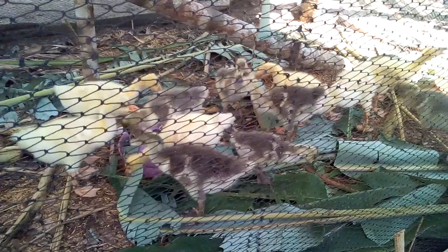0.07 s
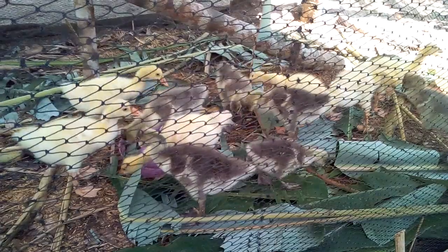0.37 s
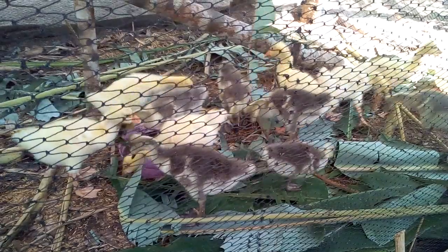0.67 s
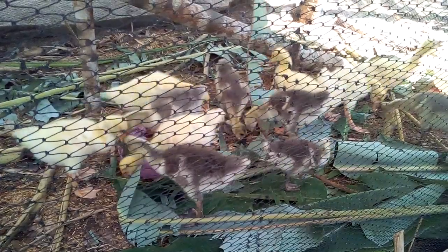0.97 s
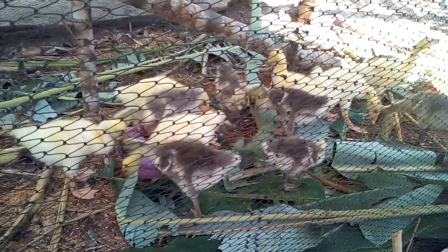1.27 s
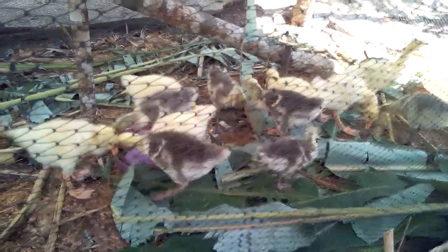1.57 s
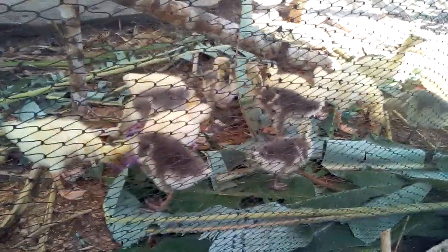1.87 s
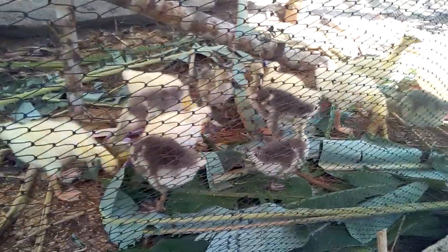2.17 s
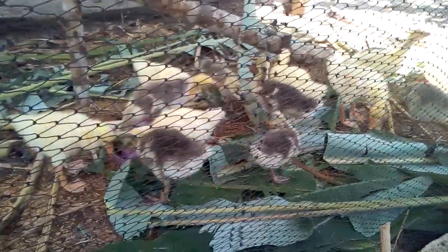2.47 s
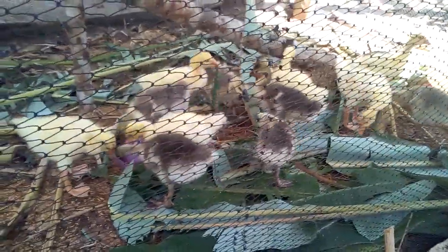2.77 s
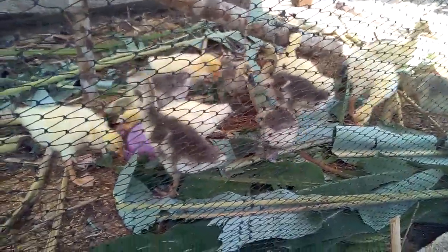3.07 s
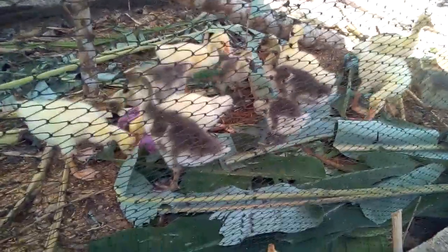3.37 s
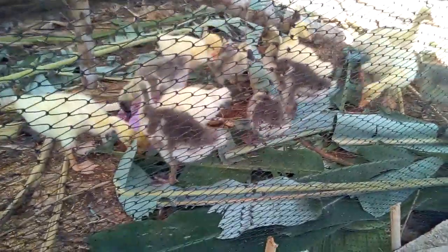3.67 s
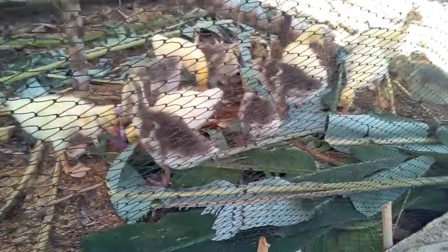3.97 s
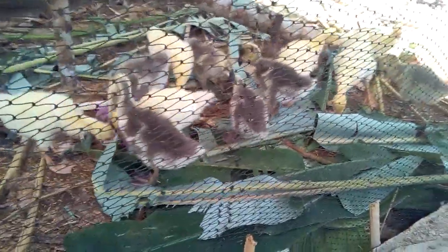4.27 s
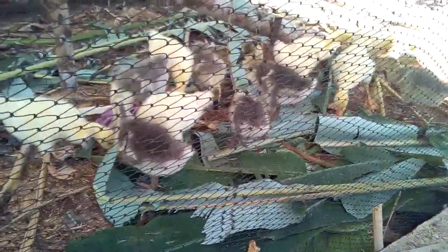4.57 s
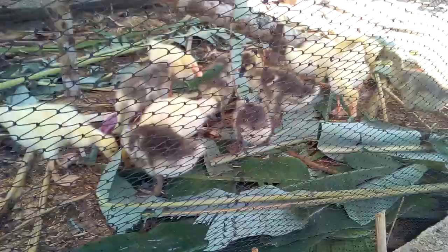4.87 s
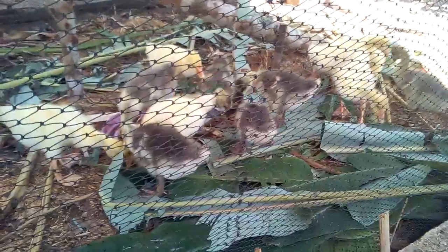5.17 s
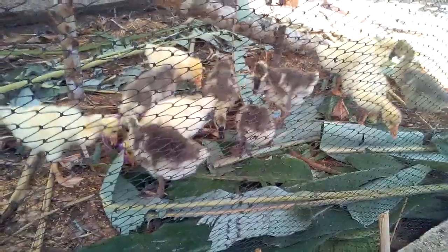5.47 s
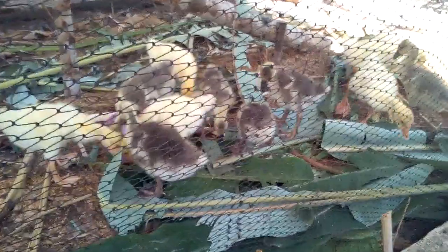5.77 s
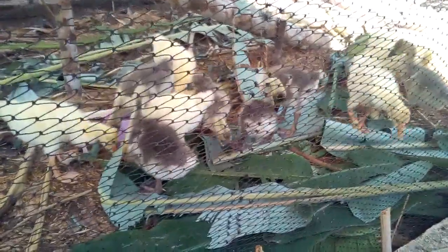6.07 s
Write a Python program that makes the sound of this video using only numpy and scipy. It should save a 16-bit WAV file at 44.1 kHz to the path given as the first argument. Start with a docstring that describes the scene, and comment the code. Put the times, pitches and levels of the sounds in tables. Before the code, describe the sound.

Soft, raspy peeps and airy hisses from young geese feeding outdoors, among light bill snaps, taps and faint litter rustle.

```python
"""Goslings feeding in a pen.

A brood eats big leaves in a netted outdoor pen, a step away. Each syrinx whistles arched, partly
rasping peeps; air forced through open bills makes long hisses, the last one close. Bills snap at
leaves, pecks and steps knock on the ground, litter rustles, and air bumps the microphone."""
import sys
import numpy as np
from scipy import signal
from scipy.fft import rfft, irfft, next_fast_len
from scipy.io import wavfile

SR = 44100
rng = np.random.default_rng(int(sys.argv[2]) if len(sys.argv) > 2 else 0)


def to_wav(sig):
    """Store sig (one row per channel, or 1-D mono) as 16-bit WAV at the path in sys.argv[1].

    Samples outside -1..1 are clipped; the rate is SR.
    """
    pcm = np.clip(np.atleast_2d(sig), -1, 1) * 32767
    pcm = np.round(pcm).astype(np.int16)
    wavfile.write(sys.argv[1], SR, pcm.T)  # frames by channels


N = 274743
TIME = np.arange(N) / SR

# Table levels are before each source's gain; pan_db is left over right.
# outdoor air: freq_hz, density_db
AIR_SPECTRUM = [(20, -26), (32, -14), (50, -2), (85, 2), (115, 0.1), (150, -5), (220, -4), (350, -10),
                (600, -11), (850, -15), (1500, -19), (2500, -34), (5000, -70)]
# left-right likeness of the background: freq_hz, coherence
COHERENCE = [(40, 1), (80, 0.3), (150, 1), (500, 0.51), (1200, 0.057), (4000, 0), (12000, 0.12)]
# feet and bills shuffling in the litter: time_s, level_db
SHUFFLE_CURVE = [(0.3, -68.5), (0.5, -67.5), (0.63, -65.5), (1.53, -63.5), (1.68, -60), (2.19, -67.5),
                 (2.42, -59), (2.86, -65), (3.32, -62), (3.65, -64), (3.88, -63), (4.14, -62.5),
                 (4.38, -67.5), (4.62, -64), (5.5, -59.5), (5.87, -58), (6.2, -59)]
# litter rustle: freq_hz, density_db
LITTER_SPECTRUM = [(300, -45), (600, -6.5), (1400, -5.5), (2200, -3), (2900, -4), (3900, 4.5), (4700, -3.5),
                   (5600, -10), (7200, -17), (8300, -28.5), (13300, -29.5), (15000, -19)]
# dry leaf cracking underfoot: freq_hz, density_db
CRACKLE_SPECTRUM = [(1500, -15), (3200, 0.5), (4700, 1.5), (7000, -14), (9000, -31.5)]
# air puffs on a microphone port: time_s, peak_db, pitch_hz, pan_db
AIR_PUFFS = [(2.364, -41, 69.5, 23), (2.557, -47, 76, 10.5), (3.105, -44.5, 88, -17),
             (3.401, -43, 59.8, -20), (3.455, -35, 85, -21), (3.598, -37.5, 80, -30),
             (3.779, -35.5, 85, -20), (4.433, -36.5, 75, -30)]
# pecks and steps: start_s, level_db, thud_hz, pan_db, clack_re_thud_db
PECKS_AND_STEPS = [(0.618, -44, 421.3, -3.5, -3), (.633, -39, 300, -2, -7), (1.133, -39.5, 236.4, -3, -12),
                   (1.207, -35, 544, -2, -13.5), (1.317, -34, 226, -1, -8), (1.329, -38, 247.9, -3, -25),
                   (1.741, -35, 248, -2.5, -21), (1.7797, -31, 245, -4.5, -2), (1.793, -34, 248, 0, -29),
                   (1.857, -38, 230.5, -3, -26), (1.964, -39.5, 300, -3, -21), (2.007, -38.5, 245, -1, -21),
                   (2.098, -39.5, 221, -2, -13), (2.175, -37.5, 543, -6, -28.5), (2.403, -30, 616, -2, -19),
                   (2.428, -38.5, 448, -4, 1), (2.513, -37, 509, 5, -20), (2.5422, -20.5, 316, 17, -21),
                   (2.5433, -24.5, 754, 14, -32), (3.088, -41.5, 208, -2, -8.5), (3.716, -41, 398, -3, -12),
                   (3.877, -46, 477, -2, 1), (3.984, -36, 606, -2, -12), (4.102, -33, 700, -5, -10),
                   (4.125, -36, 384, -12, -5.5), (4.215, -27, 270.6, -18, -22),
                   (4.271, -22.5, 745, -8, -26), (4.274, -25, 343, 5, -42), (4.332, -35, 506, -4, -18),
                   (4.445, -37, 484, -6, -24), (4.472, -38.5, 607, -3, -33), (4.578, -35.5, 577, -3, -27),
                   (5.212, -34, 585, -2, -27), (5.484, -36, 800, -7, -6.5)]
# stiff leaf: freq_hz, level_db, t60_s
LEAF_MODES = [(501, -9.5, 0.055), (720, -4, 0.02), (1078.8, 3.5, 0.016), (1510, 6, 0.0066),
              (1620, 5, 0.018)]
# bills snapping at leaves: start_s, level_db, pan_db, tick_hz, body_re_tick_db, build_s
BILL_SNAPS = [(1.202, -40, -6, 4700, 1.5, 0.0038), (1.217, -36.5, -14, 4540, 0, 0.0023),
              (1.645, -25, -9, 4450, -5.5, 0.0019), (1.655, -31.5, 5.5, 4500, -4, 0.0022),
              (2.426, -27, -15, 4160, -4, 0.0017), (2.433, -24, 16.5, 4340, -11, 0.00066),
              (3.573, -41, 2.5, 3300, -9, .0018), (3.619, -45, -5, 5400, -16, .0012),
              (3.771, -41, -5, 4600, 0, .0035), (3.877, -47, 2, 4900, -8, .002),
              (4.043, -42.5, -7, 4800, -14, 0.0038), (4.099, -39.5, -11, 4700, 4.5, 0.0063),
              (4.1253, -29.5, -19, 4200, -14, 0.00056), (4.2147, -20.5, -32, 4530, -7.5, 0.00035),
              (4.265, -29, -23, 4530, -14, 0.00078), (4.2695, -22.5, -10, 3760, -0.5, 0.00064),
              (4.2717, -14.5, -18, 4670, -27, 0.00052)]
# hisses mid-brood and faint wheezes behind: start_s, length_s, attack_s, release_s, level_db,
# sag_db_per_s, low_hz, high_hz, high_db, glide_oct_per_s, pan_db
FAR_HISSES = [(1.418, 0.36, 0.19, 0.13, -48, -5, 4060, 5900, -10, 0.0038, -4.5),
              (1.68, 1.01, 0.29, 0.15, -44, 5.5, 3927, 5667, -9.5, -.05, -3),
              (2.63, .89, 0.24, 0.093, -42.5, 5, 3875, 5740, -21, -.1, -3)]
WHEEZES = [(.08, 0.3, 0.0162, 0.065, -57.5, 60, 3640, 4520, -11, -0.04, -1.07),
           (.38, 0.89, 0.029, 0.036, -63.5, 14, 3650, 4480, -11, -0.01, -1),
           (3.45, 0.72, 0.06, 0.065, -62, 1, 3546, 4490, -12, -.03, -1),
           (4.259, 0.19, 0.03, 0.055, -58.5, 4, 3530, 4350, -25, -0.65, -1)]
# close hiss and its resonances: time_s, level_db, low_hz, mid_db, mid_hz, high_db, high_hz, air_db
CLOSE_HISS_CURVE = [(5.05, -38, 4135, -57, 5760, -55, 6400, -85.5),
                    (5.092, -45.5, 4413, -60, 5710, -60, 6400, -73),
                    (5.24, -37.5, 4414, -52, 5580, -46, 6420, -68),
                    (5.33, -34.5, 4486, -48, 5950, -38.5, 6500, -64),
                    (5.42, -34.5, 4580, -47, 5900, -35, 6600, -64),
                    (5.516, -31.5, 4690, -43, 6360, -36, 6820, -55),
                    (5.574, -36, 4780, -41, 6360, -41, 6950, -61.5),
                    (5.654, -33, 4740, -39.5, 6500, -38.5, 7200, -62),
                    (5.75, -34, 4804, -35.5, 6370, -42, 7300, -59),
                    (5.858, -33, 4627, -37, 5964, -55, 7600, -55.5),
                    (5.962, -29.5, 4660, -36, 5840, -48, 7600, -55),
                    (5.992, -33, 4850, -34, 5900, -47, 7600, -54),
                    (6.074, -31.5, 4550, -38, 5480, -43, 7450, -57.5),
                    (6.23, -32, 4564, -34, 5310, -48, 7350, -57)]
# breath of the far hisses, of the close hiss, and its high air: freq_hz, density_db
FAR_RUSH_SPECTRUM = [(900, -17), (2000, -5.5), (2800, -9.5), (3800, 4.5), (4900, 5), (5600, -0.5),
                     (6600, -3.5), (7500, -12.5), (8200, -21.5), (9300, -21.5), (13000, -38), (15000, -46)]
CLOSE_RUSH_SPECTRUM = [(250, -23.5), (600, -17.5), (1200, -26.5), (1900, -12.5), (2400, -7), (3100, -7),
                       (3800, 1.5), (5000, -2), (6000, -5.5), (7700, -13), (8600, -30), (13300, -54)]
HIGH_AIR_SPECTRUM = [(5500, -23), (6800, 4), (7700, 5), (8500, 3), (9400, 2), (10500, -3), (13300, -20),
                     (15000, -7)]
# plain whistles: start_s, length_s, start_hz, end_hz, level_db, rasp, pan_db
WHISTLE_NOTES = [(0.399, 0.055, 3930, 4900, -48, 0.45, 3), (0.5, 0.04, 4880, 4600, -49, 0.35, 0),
                 (0.64, 0.065, 3550, 4900, -46.5, 0.65, 0), (0.755, 0.035, 4600, 3300, -50, 0.5, 0),
                 (0.845, 0.045, 3600, 4700, -48, 0.7, -2), (0.658, 0.062, 1786, 2637, -49.5, 0.7, -7.5),
                 (0.736, 0.1, 3225, 3264, -48.5, 0.1, 15), (0.765, 0.062, 4700, 4540, -49.5, .14, -0.5),
                 (0.935, 0.035, 4540, 4650, -48.5, 0.12, 2), (1.01, 0.17, 3445, 3380, -52, 0.05, 9.5),
                 (1.17, 0.103, 3340, 3195, -54.5, .2, 14), (1.072, 0.13, 1854, 3281, -56.5, 0.29, -3.5),
                 (1.117, 0.042, 4400, 3300, -50.5, 0.65, 2), (1.35, 0.071, 2321, 2350, -62, 0, -5),
                 (1.409, 0.087, 2508, 3063, -61, 0.15, -3), (1.478, 0.084, 1986, 3260, -52, 0.43, -3.5),
                 (1.532, 0.1, 2780, 3330, -47, 0.42, 2.5), (1.716, 0.23, 2897, 2832, -57, 0, 8.5),
                 (2.295, 0.052, 3312, 3480, -52.5, .1, 2.5), (2.591, 0.02, 3836, 3690, -41.5, 0.06, -3),
                 (2.844, .034, 2215, 2640, -50, 0.46, -0.5), (4.475, 0.05, 4250, 4100, -52, 0.5, 2),
                 (4.594, 0.028, 3330, 4239, -41.5, 0.08, 11), (4.687, 0.034, 4010, 4370, -51, 0.16, 3.5),
                 (4.743, 0.08, 4030, 3964, -50, 0.2, 3), (4.692, 0.0747, 2085, 2214, -50, 0.2, -4),
                 (4.976, 0.052, 5030, 4700, -47, 0.35, -1), (5.352, 0.028, 2080, 2300, -42, 0.05, 3)]
# arched peeps: top_s, climb_s, fall_s, start_hz, top_hz, end_hz, climb_db, fall_db, rest_rasp, pan_db,
# drop_s, break_half_s, break_depth_db, accent_db, second_voice_db
PEEP_CALLS = [(.224, 0.061, 0.12, 1550, 2810, 1760, -47, -56.5, 0.73, -4, 0.023, 0.028, 10.5, 11, -11),
              (.441, 0.064, 0.041, 1783, 2354, 2070, -52.5, -45.5, 0.43, -5, 0.02, 0.0087, 2, 2, -14),
              (.49, 0.041, 0.1, 2500, 3405, 1945, -49, -45.5, 0.58, -3.5, 0.019, .014, 4, 3.5, -15),
              (0.694, 0.075, 0.065, 2600, 4185, 2140, -43.5, -43, 0.24, -1.5, 0.017, 0.029, 5, 3, -24),
              (0.776, 0.044, 0.1, 2171, 2620, 1985, -54, -47.5, 0.48, -3, 0.024, 0.013, 1, 5, -20.5),
              (.89, 0.057, 0.084, 3150, 4690, 2264, -45.5, -46, 0.38, -2.5, 0.021, 0.016, 16, -1, -31),
              (3.675, 0.094, 0.064, 1900, 2517, 1680, -51, -53.5, 0.71, -4, 0.02, 0.018, 8.5, 9, -5),
              (3.934, 0.081, 0.11, 1566, 2693, 1637, -45, -49, 0.19, -4.5, 0.024, 0.014, 31, 13, -20),
              (4.2, 0.081, 0.079, 1855, 2778, 1632, -44, -43, 0.06, -4.5, 0.034, 0.02, 9, 2, -7.5),
              (4.501, 0.091, 0.066, 2320, 4050, 3140, -58, -48, 0.08, 3.5, 0.017, 0.028, 12, -12, -30),
              (4.645, .062, 0.055, 1597, 3270, 2042, -46, -46, 0.33, -2, 0.017, 0.0115, 1, 4, -5),
              (4.79, 0.062, 0.053, 2630, 2513, 1806, -51, -54.5, 0.2, 6.5, 0.018, 0.017, 3.5, 7, -13),
              (4.901, 0.067, 0.083, 2150, 3760, 2122, -43, -45, 0.17, 5.5, 0.026, 0.0185, 2.5, -6, -28),
              (5.002, 0.055, 0.09, 2150, 3750, 1789, -47, -52.5, 0.35, 4, 0.0187, 0.026, 13, 7, -12),
              (5.158, 0.067, 0.1, 1600, 3005, 1710, -51, -52, 0.38, -3, 0.024, 0.021, 3.5, 3, -11),
              (5.411, 0.066, 0.051, 1950, 3340, 1920, -46, -45.5, 0.15, 3, 0.019, 0.019, 4.5, 5, -25)]
# echoes off the ground and pen sides: left_delay_s, right_delay_s, level_db
PEN_ECHOES = [(.0023, 0.0022, -5.5), (.0079, 0.011, -6), (0.0147, .0171, -9), (0.026, 0.025, -11.5)]

SURGE_DB, SURGE_HZ = 0.72, 27  # breath pressure in a hiss


def from_db(db):
    return 10 ** (np.asarray(db) / 20)


def unit_rms(x):
    return x / np.sqrt(np.mean(np.abs(x) ** 2) + 1e-20)


def in_time(rows):
    """Curve columns, interpolated per sample."""
    time_s, *columns = np.transpose(rows)
    return [np.interp(TIME, time_s, column) for column in columns]


def per_bin(points, size):
    """A spectrum at the FFT bins, interpolated in log frequency."""
    hz, value = np.transpose(points)
    return np.interp(np.log(np.fft.rfftfreq(size, 1 / SR) + 1), np.log(hz), value)


def butter(x, order, hz, kind="low"):
    return signal.sosfilt(signal.butter(order, hz, kind, fs=SR, output="sos"), x)


def gate(t, fade_s):
    return np.clip(np.minimum(t - t[0], t[-1] - t) / fade_s, 0, 1)


def panned(x, pan_db):
    """Constant-power stereo."""
    ratio = from_db(pan_db)
    return np.array([x * ratio, x]) * np.sqrt(2 / (1 + ratio ** 2))


def placed(x, pan_db, lag_s):
    """Pan, with the left microphone port lagging by lag_s."""
    left, right = panned(x, pan_db)
    size = next_fast_len(len(x) + SR // 100)
    delay = np.exp(-2j * np.pi * np.fft.rfftfreq(size, 1 / SR) * lag_s)
    return np.array([irfft(rfft(left, size) * delay, size)[:len(x)], right])


def add(out, start_s, sound):
    i = max(round(start_s * SR), 0)
    out[:, i:i + sound.shape[1]] += sound[:, :N - i]


def wander(rate_hz, size=N):
    """Smooth noise up to rate_hz; rms 1."""
    padded = next_fast_len(size, True)
    hz = np.fft.rfftfreq(padded, 1 / SR)
    bins = rfft(rng.standard_normal(padded)) / (1 + (hz / rate_hz) ** 4)
    return unit_rms(irfft(bins, padded)[:size])


def coloured(x, spectrum):
    """Filter by a spectrum; rms 1."""
    size = next_fast_len(x.shape[-1], True)
    bins = rfft(x, size) * from_db(per_bin(spectrum, size))
    return unit_rms(irfft(bins, size)[..., :min(x.shape[-1], N)])


def stereo_noise(spectrum):
    """Coloured noise, left and right alike in the bass, unrelated in the treble."""
    size = next_fast_len(N)
    alike = per_bin(COHERENCE, size)
    mid, side = rfft(rng.standard_normal((2, size)))
    bins = np.sqrt(1 + alike) * mid + np.sqrt(1 - alike) * side * [[1], [-1]]
    return coloured(irfft(bins, size), spectrum)


def resonance(hz, width_hz):
    """Turbulence ringing in a moving resonance; rms 1."""
    phase = 2 * np.pi * np.cumsum(hz) / SR
    return wander(width_hz / 2, len(hz)) * np.cos(phase) + wander(width_hz / 2, len(hz)) * np.sin(phase)


def ring(t, hz, t60_s):
    """A struck mode."""
    return np.sin(2 * np.pi * hz * t) * np.exp(-np.log(1000) * t / t60_s)


def pen(x, echo_db, tail_db, t60_s):
    """Add close echoes and a short scattered tail, different per side."""
    t = TIME[:SR // 3]
    response = rng.standard_normal((2, len(t))) * np.exp(-np.log(1000) * t / t60_s)
    response *= from_db(tail_db) / np.sqrt(np.sum(response ** 2) / 2)
    for left_s, right_s, db in PEN_ECHOES:
        response[[0, 1], [round(left_s * SR), round(right_s * SR)]] += from_db(db + echo_db)
    return x + signal.fftconvolve(x, response, axes=1)[:, :N]


def leaf_echo(x, start_s, echo_s, stretch_per_s, echo_db, right_ratio=1.31):
    """Add an echo off the leaves; its delay drifts as the head moves, so the comb glides."""
    delay_s = echo_s * np.exp(stretch_per_s * np.clip(TIME - start_s, 0, 2))
    left = np.interp(TIME - delay_s, TIME, x[0])
    right = np.interp(TIME - delay_s * right_ratio, TIME, x[1])
    return x + from_db(echo_db) * np.array([left, right])


def outdoor_air(level_db=-57, gust_db=2.5, gust_hz=9.6):
    """Low, gusting air noise."""
    return stereo_noise(AIR_SPECTRUM) * panned(from_db(level_db + gust_db * wander(gust_hz)), -2.5)


def litter(gain_db=11.5, grain_db=2, grain_hz=105, cracks_per_s=110, crack_db=-11):
    """Feet and bills stir the litter: grainy rustle, tiny cracks of dry leaf."""
    cracks = (rng.random((2, N)) < cracks_per_s / SR) * rng.standard_normal((2, N))
    rustle = stereo_noise(LITTER_SPECTRUM) + from_db(crack_db) * coloured(cracks, CRACKLE_SPECTRUM)
    return rustle * from_db(in_time(SHUFFLE_CURVE)[0] + gain_db + grain_db * wander(grain_hz))


def mic_bumps(sigma_s=0.0095, gain_db=-1):
    """Air puffs push a microphone port back and forth a couple of times."""
    out, t = np.zeros((2, N)), TIME[:SR // 8] - 1 / 16
    envelope = np.exp(-0.5 * (t / sigma_s) ** 2)
    for time_s, db, hz, pan_db in AIR_PUFFS:
        sway = np.sin(2 * np.pi * hz * t + 0.86 * wander(73, len(t)))
        add(out, time_s + t[0], panned(from_db(db + gain_db) * sway * envelope, pan_db))
    return out


def knock(hz, clack_db, t60_cycles=5, contact_hz=1900, crunch_db=-15, crunch_s=0.03):
    """The ground thuds; the leaf on it clacks and crunches as it gives."""
    t = TIME[:SR // 10]
    leaf = np.zeros(len(t))
    for k, (mode_hz, db, t60_s) in enumerate(LEAF_MODES):
        strength = (-1) ** k * from_db(db + rng.normal(0, 2.5))
        leaf += strength * ring(t, mode_hz * (1 + rng.normal(0, 0.04)), t60_s)
    crunch = unit_rms(butter(rng.standard_normal(len(t)), 2, [400, 1900], "band"))
    crunch *= from_db(crunch_db) * np.exp(-t / crunch_s)
    ground = from_db(-13) * ring(t, hz=215, t60_s=0.067)
    thud = butter(ring(t, hz, t60_cycles / hz) + ground, 1, 110, "high")
    return butter(thud + from_db(clack_db) * (leaf + crunch), 4, contact_hz)


def pecks_and_steps(gain_db=1, patter_db=-48.1, patter_count=50):
    """Clear knocks amid the brood's faint random patter."""
    out = np.zeros((2, N))
    for start_s, db, hz, pan_db, clack_db in PECKS_AND_STEPS:
        add(out, start_s, panned(from_db(db + gain_db) * knock(hz, clack_db), pan_db))
    for when, force, pitch in rng.random((patter_count, 3)):
        step = from_db(patter_db + 1.56 * force) * knock(200 + 480 * pitch ** 2, clack_db=-18)
        add(out, when * TIME[-1], panned(step, pan_db=-7))
    return out


def bill_snaps(gain_db=1, body_gain_db=-2, width_hz=1400, top_hz=6900, fizz_hz=13000, fizz_db=-2):
    """A bill closes on a leaf: tiny fractures build and die within milliseconds."""
    out, t = np.zeros((2, N)), TIME[:SR // 40]
    for start_s, db, pan_db, tick_hz, body_db, build_s in BILL_SNAPS:
        fractures = rng.standard_normal((2, len(t))) * t * np.exp(-t / build_s)
        tick = butter(fractures[0], 2, [tick_hz - width_hz / 2, tick_hz + width_hz / 2], "band")
        body = butter(fractures[1], 1, [800, 2600], "band")
        snap = tick / np.abs(tick).max() + from_db(body_db + body_gain_db) * body / np.abs(body).max()
        add(out, start_s, panned(from_db(db + gain_db) * snap, pan_db))
    out += 1e-18  # avoids denormals
    return butter(out, 6, top_hz) + from_db(fizz_db) * butter(out, 4, fizz_hz, "high")


def open_bill(hz, width_hz, core_db, stray=0.04, stray_hz=11):
    """Broad bill resonance with a narrow, half-whistling core straying in it; rms 1."""
    core = resonance(hz * (1 + stray * wander(stray_hz, len(hz))), width_hz=170)
    return unit_rms(resonance(hz, width_hz) + from_db(core_db) * core)


def hiss(row, rush_db, low_db, low_width_hz, core_db, high_width_hz, sputter_db, lag_s, bow_oct=0.12):
    """Air forced through an open bill: a rush and two gliding resonances, sputtering together."""
    start_s, length_s, attack_s, release_s, db, sag_db_per_s = row[:6]
    low_hz, high_hz, high_db, glide_oct_per_s, pan_db = row[6:]
    out, t = np.zeros((2, N)), np.arange(0, length_s, 1 / SR)
    from_middle_s = t - length_s / 2
    # the bill opens and closes, bowing the resonances upwards
    bend = 2 ** (glide_oct_per_s * from_middle_s + bow_oct * np.sin(np.pi * t / length_s))
    waver_hz = 110 * wander(14, len(t))
    low = from_db(low_db) * open_bill(low_hz * bend + waver_hz, low_width_hz, core_db)
    high = from_db(high_db) * resonance(high_hz * bend + waver_hz, high_width_hz)
    swell = np.clip(np.minimum(t / attack_s, (length_s - t) / release_s), 0, 1) ** 0.98
    unsteady_db = SURGE_DB * wander(SURGE_HZ, len(t)) + sputter_db * wander(63, len(t))
    pressure = swell * from_db(db - sag_db_per_s * from_middle_s + unsteady_db)
    rush = from_db(rush_db) * coloured(rng.standard_normal(len(t)), FAR_RUSH_SPECTRUM)
    add(out, start_s, placed(pressure * (rush + low + high), pan_db, lag_s))
    return out


def wheezes():
    """Faint, thin hisses from the back of the brood."""
    return sum(hiss(row, rush_db=-9, low_db=-1, low_width_hz=550, core_db=-4,
                    high_width_hz=880, sputter_db=3, lag_s=-0.00023) for row in WHEEZES)


def far_hisses():
    """Three hisses from mid-brood, echoing off the leaves."""
    out = np.zeros((2, N))
    for row in FAR_HISSES:
        direct = hiss(row, rush_db=-3.5, low_db=-3.3, low_width_hz=760, core_db=-5,
                      high_width_hz=1000, sputter_db=1.4, lag_s=0.00004)
        out += leaf_echo(direct, start_s=row[0], echo_s=0.0026, stretch_per_s=0.36, echo_db=-8)
    return out


def close_hiss(start_s=4.93, swell_s=0.19, sputter_db=0.63):
    """A long, near hiss: the top resonance climbs, the middle one flares and sinks, high air joins."""
    db, low_hz, mid_db, mid_hz, high_db, high_hz, air_db = in_time(CLOSE_HISS_CURVE)
    swell = np.clip((TIME - start_s) / swell_s, 0, 1)
    pressure = swell * from_db(SURGE_DB * wander(SURGE_HZ) + sputter_db * wander(88))
    rush = from_db(db - 7) * coloured(rng.standard_normal(N), CLOSE_RUSH_SPECTRUM)
    low = from_db(db - 4.5) * open_bill(low_hz, width_hz=1100, core_db=-4, stray=0.05)
    mid = from_db(mid_db - 6) * resonance(mid_hz, width_hz=1800)
    high = from_db(high_db - 6) * open_bill(high_hz, width_hz=700, core_db=-5, stray=0.033)
    air = from_db(air_db + 3.5) * coloured(rng.standard_normal(N), HIGH_AIR_SPECTRUM)
    lower = placed(pressure * (rush + low), pan_db=0.5, lag_s=-0.00022)
    upper = placed(pressure * (mid + high + air), pan_db=-5.5, lag_s=0.00015)
    return leaf_echo(lower + upper, start_s, echo_s=0.0051, stretch_per_s=-0.111, echo_db=-14)


def syrinx(t, hz, db, rasp, pan_db, jitter=0.105, jitter_hz=590, flutter_db=5.5, flutter_hz=200,
           bill_hz=4300, bill_half_width_hz=600, gain_db=1.85):
    """A whistling syrinx; rasp (0-1) shakes pitch and strength fast and irregularly."""
    phase = 2 * np.pi * np.cumsum(hz * (1 + jitter * rasp * wander(jitter_hz, len(t)))) / SR
    # the octave peaks at the bill resonance and fades above it
    boost_db = 9 / (1 + ((2 * hz - bill_hz) / bill_half_width_hz) ** 2)
    octave_db = -15 + boost_db - 47 * np.clip(hz / 2500 - 1, 0, 2)
    tone = np.sqrt(2) * (np.sin(phase) + from_db(octave_db) * np.sin(2 * phase))
    flutter = unit_rms(from_db(flutter_db * np.sqrt(rasp) * wander(flutter_hz, len(t))))
    lag_s = 0.00025 * np.tanh(0.11 - pan_db / 10)  # the louder side tends to lead
    return placed(tone * flutter * from_db(db + gain_db) * gate(t, 0.004), pan_db, lag_s)


def whistles(fade_db=5):
    """Thin notes on a straight glide, loudest midway."""
    out = np.zeros((2, N))
    for start_s, length_s, start_hz, end_hz, db, rasp, pan_db in WHISTLE_NOTES:
        t = np.arange(0, length_s, 1 / SR)
        progress = t / length_s
        hz = start_hz + (end_hz - start_hz) * progress
        add(out, start_s, syrinx(t, hz, db - fade_db * (2 * progress - 1) ** 2, rasp, pan_db))
    return out


def peeps(climb_bend=1.4, drop_bend=1.817, fade_db=10.5, accent_s=0.02, accent_width_s=0.0059,
          unsteady_db=2.5, unsteady_hz=55, second_ratio=0.84, leak_hz=4390):
    """The pitch climbs, the voice breaks into rasp at the top, then drops to a low note."""
    out = np.zeros((2, N))
    for (top_s, climb_s, fall_s, start_hz, top_hz, end_hz, climb_db, fall_db, rest_rasp, pan_db,
         drop_s, break_half_s, break_depth_db, accent_db, second_voice_db) in PEEP_CALLS:
        t = np.arange(-climb_s, fall_s, 1 / SR)
        from_top = np.clip(np.maximum(-t / climb_s, t / fall_s), 0, 1)
        climb_hz = start_hz + (top_hz - start_hz) * (1 - from_top) ** climb_bend
        drop_hz = end_hz + (top_hz - end_hz) * np.exp(-np.abs(t / drop_s) ** drop_bend)
        hz = np.where(t < 0, climb_hz, drop_hz)
        broken = np.exp(-(t / break_half_s) ** 4)
        rasp = rest_rasp + (1 - rest_rasp) * broken
        effort_db = np.interp(t, [-break_half_s, break_half_s], [climb_db, fall_db])
        accent = np.exp(-((t - accent_s) / accent_width_s) ** 2)
        db = effort_db - break_depth_db * broken + accent_db * accent - fade_db * from_top ** 3
        db += unsteady_db * wander(unsteady_hz, len(t))
        voice = syrinx(t, hz, db, rasp, pan_db)
        # the other side of the syrinx joins in lower
        second_db = db + second_voice_db - fade_db * from_top ** 2
        voice += syrinx(t, hz * second_ratio, second_db, rasp, pan_db)
        # air escapes through the bill
        leak_db = effort_db - 14 - 13 * from_top ** 2
        leak = resonance(np.full(len(t), leak_hz), width_hz=2000) * from_db(leak_db)
        add(out, top_s - climb_s, voice + panned(leak * gate(t, 0.0091), pan_db))
    return out


def scene():
    """Calls, feeding and hisses in the pen, over the background."""
    calls = pen(peeps() + whistles(), echo_db=-3, tail_db=-13, t60_s=0.18)
    feeding = pen(bill_snaps() + pecks_and_steps(), echo_db=-16, tail_db=-24, t60_s=0.098)
    hisses = pen(far_hisses() + wheezes() + close_hiss(), echo_db=-3.5, tail_db=-1, t60_s=0.14)
    return calls + feeding + hisses + mic_bumps() + litter() + outdoor_air()


def record(dry, start_s=0.042, fade_s=0.24, cutoff_hz=15600):
    """Fade-in and steep low-pass."""
    fade = np.clip((TIME - start_s) / fade_s, 0, 1)
    return signal.sosfilt(signal.ellip(12, 0.1, 80, cutoff_hz, fs=SR, output="sos"), dry * fade)


dry = scene()
out = record(dry)
to_wav(out)
```